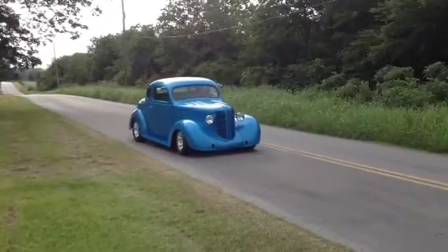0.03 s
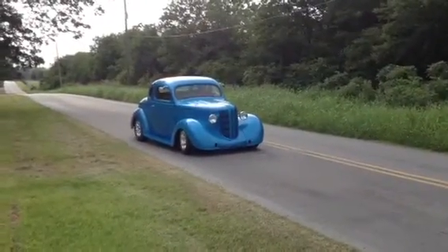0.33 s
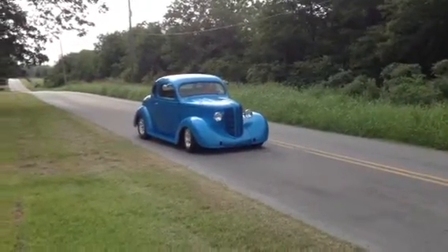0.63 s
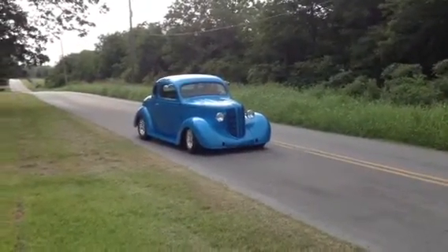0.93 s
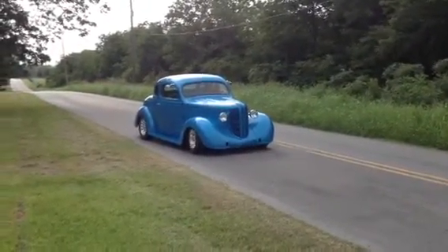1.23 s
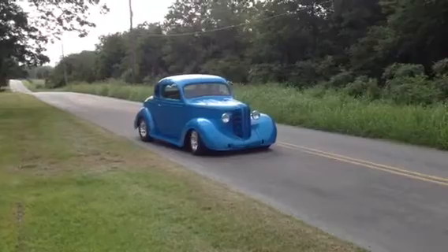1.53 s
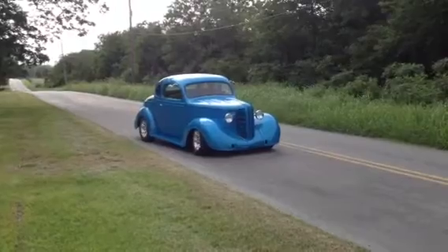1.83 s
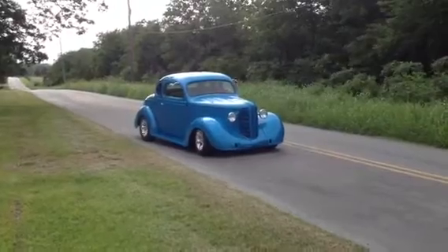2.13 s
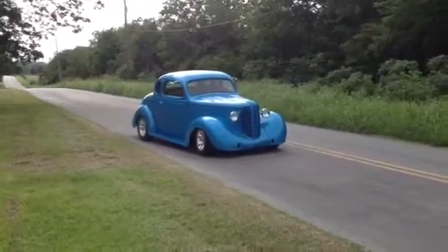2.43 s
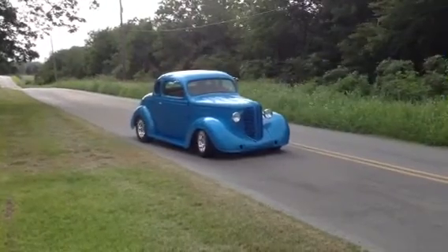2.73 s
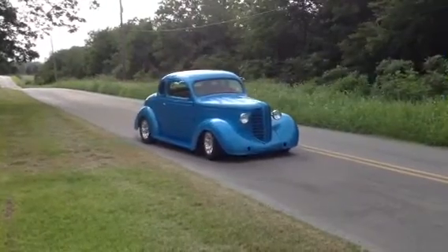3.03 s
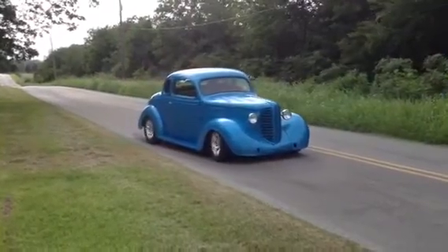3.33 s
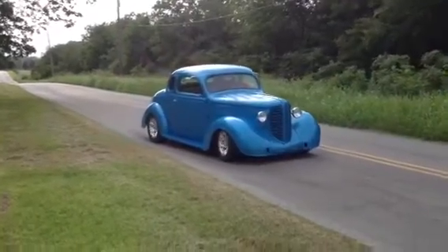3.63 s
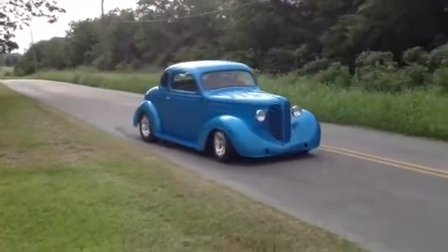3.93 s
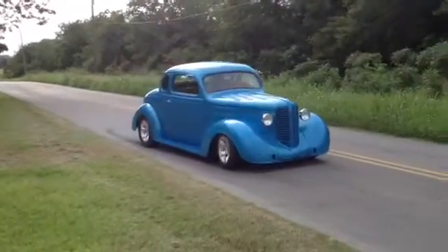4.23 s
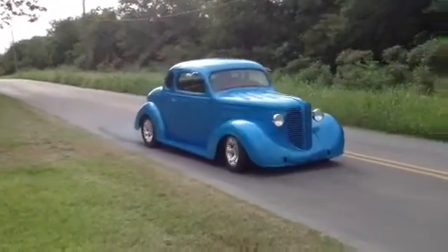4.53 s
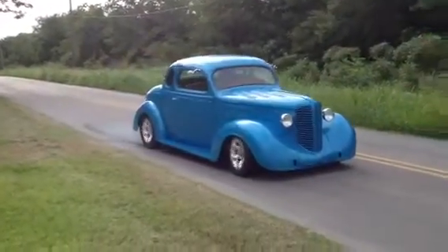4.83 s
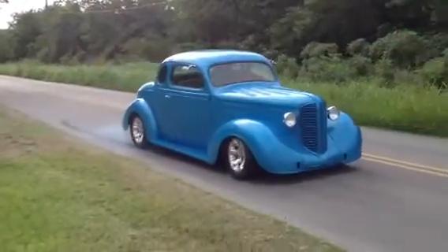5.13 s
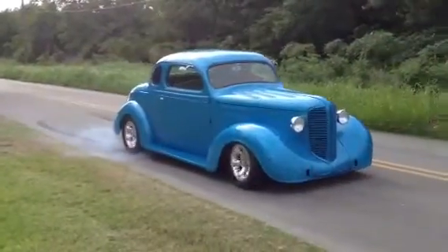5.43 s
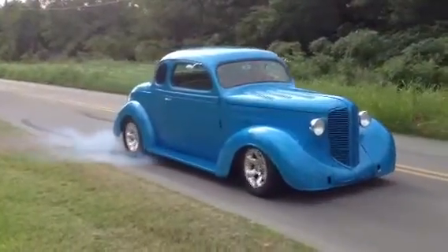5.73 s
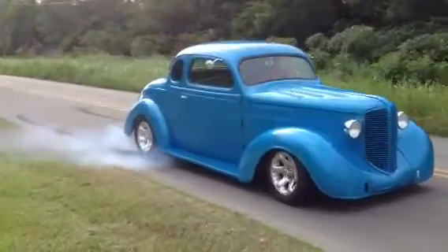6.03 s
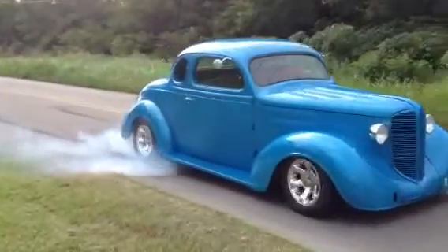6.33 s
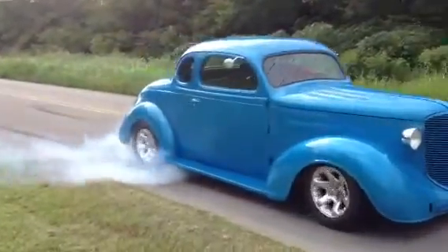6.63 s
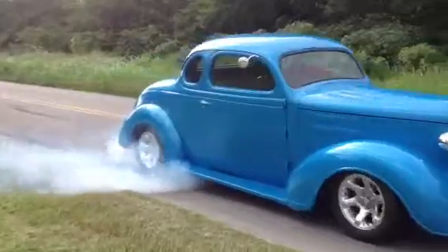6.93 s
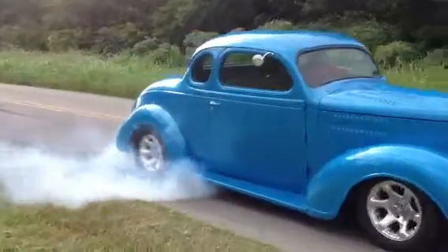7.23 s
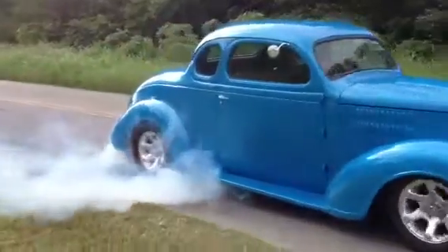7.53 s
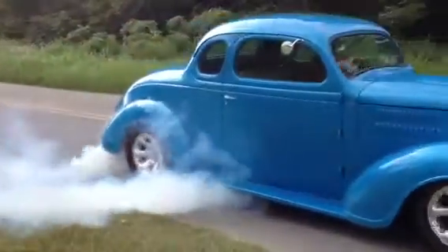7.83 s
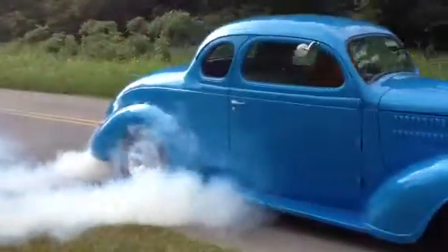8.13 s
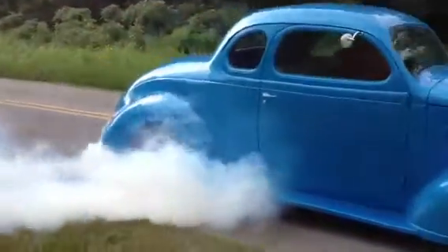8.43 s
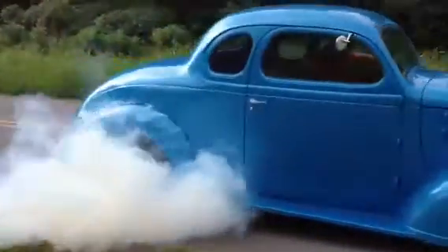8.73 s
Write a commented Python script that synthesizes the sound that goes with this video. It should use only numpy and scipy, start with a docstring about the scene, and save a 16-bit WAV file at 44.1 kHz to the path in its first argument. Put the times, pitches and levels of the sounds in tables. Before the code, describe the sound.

A hot rod engine pulses low, then revs up as the car approaches, its spinning rear tyre screeching and hissing in a burnout.

```python
"""A country road, one microphone on the verge. Some way off, a V8 hot rod creeps closer, exhaust pulsing
at low revs, its spinning rear tyre screeching and chirping in three tread resonances over the hiss of
scrubbed rubber. A thin, high whistle comes and goes. From about 5 s the revs climb, the microphone is
nudged once, and the lowest tread resonance narrows to a squeal. At 8.4 s the car draws alongside:
the hiss is brighter and the tailpipes throb in the open."""
import sys
import numpy as np
from scipy import signal
from scipy.fft import rfft, irfft, next_fast_len
from scipy.io import wavfile
from scipy.ndimage import uniform_filter1d, minimum_filter1d

SR = 44100
rng = np.random.default_rng(int(sys.argv[2]) if len(sys.argv) > 2 else 0)


def unload_wav(signal):
    """Save mono or channel-first audio to the path in sys.argv[1] as 16-bit WAV at rate SR, clipped to [-1, 1]."""
    wavfile.write(
        sys.argv[1],
        SR,
        np.round(np.clip(np.atleast_2d(signal).T, -1, 1) * 32767).astype(np.int16),
    )


N = 396459
TIME = np.arange(N) / SR
FIRING_ORDER = 8   # cylinders fired in each engine cycle
# lowest tread resonance: time_s, pitch_hz, level_db
SQUEAL_CURVE = [(0, 1090, -22), (.5, 1105, -19), (2.3, 1060, -19), (3.6, 1055, -21), (4.2, 1090, -23.5),
                (5.4, 1125, -22.5), (6.1, 1180, -19), (6.8, 1232, -13), (7.15, 1192, -8),
                (7.35, 1185, -6.5), (7.46, 1262, -9), (7.95, 1282, -12.5), (8.6, 1305, -21.5),
                (8.99, 1315, -21)]


def from_db(db):
    """Decibels to gain."""
    return 10 ** (np.asarray(db) / 20)


def unit_rms(x):
    """Scale to unit power."""
    return x / np.sqrt(np.mean(np.abs(x) ** 2) + 1e-20)


def in_time(rows):
    """Each column of a curve at every sample."""
    time_s, *columns = np.transpose(rows)
    return [np.interp(TIME, time_s, column) for column in columns]


def between(ends, share):
    """From the first value to the second as the share goes from 0 to 1."""
    return ends[0] + (ends[1] - ends[0]) * np.clip(share, 0, 1)


def phase_of(hz):
    """Running phase of a steady or moving frequency, in radians."""
    return 2 * np.pi * np.cumsum(hz * np.ones(N)) / SR


def bell_db(hz, centre_hz, width_hz, db):
    """Boost or cut of a line as it passes through a resonance."""
    return db * np.exp(-((hz - centre_hz) / width_hz) ** 2)


def drift(rate_hz):
    """Smooth random wander of spread 1."""
    hop, settle = 40, 2000
    pole = np.exp(-2 * np.pi * hop * rate_hz / SR)
    noise = rng.standard_normal(N // hop + settle + 2)
    slow = signal.lfilter([1], [1, -2 * pole, pole * pole], noise)[settle:]
    return np.interp(np.arange(N) / hop, np.arange(len(slow)), unit_rms(slow))


def coloured_noise(colour):
    """Steady noise with the given spectral shape, rms 1."""
    size = next_fast_len(N)
    hz, db = np.transpose(colour)
    bin_hz = np.maximum(np.arange(size // 2 + 1) * SR / size, 1)
    gain = from_db(np.interp(np.log(bin_hz), np.log(hz), db))
    return unit_rms(irfft(rfft(rng.standard_normal(size)) * gain, size)[:N])


def resonance(hz, width_hz, saturation, skirt):
    """A randomly driven mode: it swells and fades as fast as its width allows; saturation caps it."""
    steps = 16   # noise samples per 1 / width_hz seconds
    pushes = rng.standard_normal((2, 60000))
    core = signal.sosfilt(signal.butter(3, 1 / steps, output="sos"), pushes)
    edge = signal.sosfilt(signal.butter(3, 3 / steps, output="sos"), pushes[:, ::-1])
    swing = unit_rms(core) + skirt * unit_rms(edge)
    swing = unit_rms(swing[0] + 1j * swing[1])[200:]
    position = steps * np.cumsum(width_hz * np.ones(N)) / SR
    swing = np.interp(position, np.arange(len(swing)), swing)
    swing = swing / np.sqrt(1 + saturation * np.abs(swing) ** 2)
    return unit_rms(np.real(swing * np.exp(1j * phase_of(hz))))


def mid_rev_dip(revs):
    """The gas noise and lesser exhaust lines are quieter at middle revs: 1 there, 0 at either end."""
    return 1 - (2 * revs - 1) ** 2


def in_the_open():
    """0 while the body shields the tailpipes, 1 once they face the microphone."""
    return np.interp(TIME, [8.4, 8.45], [0, 1])


def whistle():
    """A faint, very high tone in short trembling spells."""
    # spells of the whistle: start_s, end_s, level_db
    spells = [(2.65, 2.848, -41.5), (3.041, 3.27, -50), (4.27, 4.33, -52), (4.42, 4.592, -49)]
    level = sum(from_db(db) * np.clip(np.minimum(TIME - start, end - TIME) / .015, 0, 1)
                for start, end, db in spells)
    return level * resonance(hz=14245, width_hz=60, saturation=1.5, skirt=.2)


def microphone_nudge(start_s=6.02):
    """One soft bump on the microphone: a push and its rebound."""
    age = np.maximum(TIME - start_s, 0) / .0014
    return from_db(-15) * age * (1 - age / 3) * np.exp(1 - age)


def rubber_scrub(crank):
    """Rubber tears on asphalt and rings the steel rim; the hiss brightens as the wheel comes into view."""
    # hiss of the scrubbed rubber: time_s, level_db
    hiss_curve = [(0.0, -35), (0.72, -31.5), (1.45, -33), (1.52, -30), (3.88, -30), (4.13, -32.5),
                  (4.38, -27.5), (4.46, -32.5), (5.18, -32), (5.26, -36), (5.53, -30.5), (5.91, -32.5),
                  (6.74, -29), (7.06, -33.5), (7.36, -28.5), (8.19, -27.5), (8.39, -24), (8.99, -23.5)]
    # the wheel clears the body: time_s, view (0 from afar, 1 nearer, 2 and over alongside)
    view_curve = [(0, 0), (4.4, 0.09), (5.3, 1.12), (7, 0.91), (8.3, 1.773), (8.99, 2.16)]
    # hiss spectrum at those three distances: frequency_hz, relative_db
    afar = [(2300, -24), (2750, 0), (3000, 5.5), (3450, -1), (4050, 2.5), (4350, 0.5), (4800, 0.5),
            (5400, -1.5), (6400, -4.5), (7900, -13), (9000, -9.5), (10200, -23.5), (11400, -13),
            (13300, -40)]
    nearer = [(3100, -13), (3700, -2.5), (4150, -2.5), (4850, 2), (5300, -2.5), (6300, -3), (7800, -12),
              (9200, -8.5), (10200, -21.5), (11500, -12), (13500, -30)]
    alongside = [(2300, -23.5), (2750, -1), (3150, -12), (3700, -9), (4400, -6), (4750, -3.5), (5150, -4),
                 (6700, -0.5), (8000, -8.5), (9400, -7.5), (10800, -18), (12800, -10), (15400, -36)]
    # spectrum of the lower rush under the hiss: frequency_hz, relative_db
    rush_colour = [(550, -33), (720, -8.5), (920, 5), (1200, 1.5), (1450, 0), (2000, 2), (2550, -2.5),
                   (2850, -10.5), (3150, -20.5), (4000, -36.5)]
    hiss_db, = in_time(hiss_curve)
    view = np.clip(in_time(view_curve)[0], 0, 2)
    hiss = sum(np.sqrt(np.maximum(1 - np.abs(view - k), 0)) * coloured_noise(colour)
               for k, colour in enumerate((afar, nearer, alongside)))
    flutter = from_db(0.87 * drift(24)) * (1 + 0.055 * np.cos(FIRING_ORDER * crank))
    rim_gain = from_db(-13.5 + 3.7 * drift(3.1))
    rim = rim_gain * resonance(hz=4780, width_hz=170, saturation=0.09, skirt=0.22)
    _, squeal_db = in_time(SQUEAL_CURVE)
    rush_db = -23 + 0.12 * (hiss_db - hiss_db.mean())
    rush_db -= 0.463 * np.maximum(squeal_db + 16, 0)   # the rush ducks while the squeal is loud
    return from_db(hiss_db) * (flutter * hiss + rim) + from_db(rush_db) * coloured_noise(rush_colour)


def tailpipe_gas(revs, crank):
    """Turbulence puffs from the pipes with each firing; at high revs a hollow resonance of the body wakes."""
    # spectrum of the turbulent gas: frequency_hz, relative_db
    gas_colour = [(30, -29), (70, -25), (110, 1), (170, -14.5), (330, 7.5), (470, -7.5), (570, 3.5),
                  (680, 10.5), (850, 8), (1100, 5.5), (1500, -18)]
    open_db = 3 * in_the_open()
    gas_db = between((-34, -34.5), revs) - 6 * mid_rev_dip(revs) + open_db
    hollow_db = np.interp(revs, [0.59, 1], [-54, -30]) + open_db
    puffs = 1 + 0.115 * np.cos(FIRING_ORDER * crank)
    throb = 1 + 0.58 * in_the_open() * np.cos(crank)
    hollow = from_db(hollow_db) * resonance(hz=335.5, width_hz=24, saturation=0.17, skirt=0.2)
    return from_db(gas_db) * puffs * throb * coloured_noise(gas_colour) + hollow


def exhaust_line(crank, order, db, waver_db):
    """One clean multiple of the engine cycle; combustion varies its strength a little."""
    level = from_db(db + waver_db * drift(11.0))
    return np.sqrt(2) * level * np.sin(order * crank + rng.uniform(0, 2 * np.pi))


def exhaust(cycle_hz, revs, crank):
    """The firing note leads at low revs; the lope of the uneven banks takes over as the revs climb."""
    # rasp of the pipes, two harmonics of the firing note: time_s, third_db, fourth_db
    rasp_curve = [(0, -59, -44.5), (2.7, -59, -36), (3.4, -69.5, -51), (4.7, -72, -52), (5.2, -42, -65),
                  (6.15, -39.5, -29.5), (6.9, -37.5, -42), (7.65, -34.5, -39), (7.95, -23, -31),
                  (8.45, -33.5, -45), (8.99, -24.5, -34)]
    # other exhaust lines: order (rounded, a multiple of the cycle rate), low_revs_db, high_revs_db
    other_lines = [(3, -88.5, -42), (4, -72.5, -50), (6, -61, -25.5), (7, -40.5, -37), (9.1, -36, -39),
                   (10, -38.5, -36), (11.1, -32, -30.5), (12, -39, -34.5), (12.524, -31, -37),
                   (13.74, -44, -44), (14.9, -58, -53), (16, -37, -38.5), (17.2, -53, -41.5),
                   (17.8, -36.5, -66), (19, -45.5, -46), (20, -58.5, -46), (21, -48.5, -45), (22, -70, -47),
                   (23, -63, -61), (26, -54.5, -45), (27, -66, -45), (29, -58, -50), (34, -43.5, -52),
                   (40, -45, -36)]
    pipe_boom_db = bell_db(FIRING_ORDER * cycle_hz, centre_hz=205.6, width_hz=36, db=9.7)
    firing_db = between((-23, -34.5), revs) + pipe_boom_db
    lope_db = between((-51.5, -19.5), revs)
    out = exhaust_line(crank, FIRING_ORDER, firing_db, waver_db=0.74)
    out += exhaust_line(crank, order=5, db=lope_db, waver_db=1.0)
    for harmonic, rasp_db in enumerate(in_time(rasp_curve), 3):
        out += exhaust_line(crank, harmonic * FIRING_ORDER, rasp_db, waver_db=1.76)
    for order, *ends_db in other_lines:
        silencer_db = bell_db(order * cycle_hz, centre_hz=395, width_hz=101, db=-8)
        line_db = between(ends_db, revs) - 1.5 * mid_rev_dip(revs) + silencer_db
        out += exhaust_line(crank, round(order), line_db, waver_db=between((1.0, 2.5), revs))
    return out * from_db(2 * in_the_open())


def tread_chirps(edge_s=0.012, wobble_hz=14, flicker_db=0.2):
    """Now and then the tread catches: one resonance rings out clean, wobbles and lets go."""
    # catches of the tread: start_s, length_s, pitch_hz, level_db
    catches = [(0.02, .05, 2020, -16.5), (1.166, .1, 1810, -27), (3.63, 0.047, 1830, -19),
               (3.944, 0.055, 1812, -19), (4.225, 0.079, 1805, -20), (4.297, 0.098, 1157, -17.5),
               (4.389, 0.041, 1775, -8), (5.53, 0.052, 1099, -19), (6.23, 0.056, 1185, -18),
               (6.357, 0.092, 1180, -17), (6.55, 0.098, 1790, -17), (7.099, 0.027, 1195, -11),
               (7.447, 0.0432, 1825, -16), (7.787, 0.029, 1784, -20), (8.066, 0.1, 1274, -10),
               (8.212, 0.044, 1272, -9.5), (8.315, 0.03, 1300, -11), (8.874, 0.052, 1320, -18)]
    wobble = phase_of(wobble_hz * drift(30.77))
    out = np.zeros(N)
    for start, length, hz, db in catches:
        held = np.clip(np.minimum(TIME - start, start + length - TIME) / edge_s, 0, 1)
        out += np.sqrt(2) * from_db(db) * held * np.sin(2 * np.pi * hz * TIME + wobble)
    return out * from_db(flicker_db * drift(45))


def tyre_tread(revs):
    """Tread blocks stick and slip, driving three resonances: low squeal, pulsing screech, high shriek."""
    # second tread resonance: time_s, pitch_hz, level_db
    screech_curve = [(0, 2022, -23), (1.6, 1922, -25.5), (3.8, 1839, -20), (4.5, 1766, -16),
                     (5.15, 1766, -16), (5.3, 1760, -21), (6.35, 1842, -20.5), (6.65, 1843, -16),
                     (7.25, 1751, -24), (7.9, 1810, -19.5), (8.15, 1907, -27), (8.99, 1928, -26.5)]
    # the squeal loses its grip for a moment: centre_s, half_length_s
    breaks = [(7.088, 0.0122), (7.135, 0.0079), (7.196, .005), (7.275, 0.006), (7.302, 0.0049),
              (7.372, 0.0094), (7.413, 0.0127), (7.591, 0.0054), (7.674, 0.016), (7.765, 0.018),
              (8.196, 0.012), (8.308, .008), (8.37, 0.012)]
    squeal_hz, squeal_db = in_time(SQUEAL_CURVE)
    screech_hz, screech_db = in_time(screech_curve)

    # the tyre hops and grabs, faster and deeper as it gains speed; deep grabs go with a loud screech
    grabs_per_s = between((14, 62), revs ** .7)
    grab = phase_of(grabs_per_s * (1 + .17 * drift(14)))
    depth = np.interp(screech_db, (-30.5, -19.5), (.2, 0.68)) * between((.45, 1), revs / 0.76)
    shake = depth * np.sin(grab)
    bursts = unit_rms(1 + depth * np.cos(grab))

    # as the wheel speeds up, the squeal locks into one narrow note held at its friction limit
    width_hz = np.interp(revs, (.35, .68), (120, 34))
    lock = 0.043 + (55 / width_hz) ** 2
    grip = np.prod([1 - 0.845 * np.exp(-((TIME - at) / half) ** 2) for at, half in breaks], axis=0)
    wandering_hz = squeal_hz + .14 * width_hz * drift(19.71)
    squeal = grip * (1 + 0.38 * shake) * resonance(wandering_hz, width_hz, saturation=lock, skirt=0.46)

    bent_hz = screech_hz + 22 * shake + 30 * drift(25.36)
    screech = bursts * resonance(bent_hz, width_hz=105, saturation=0.13, skirt=0.93)

    # the shriek, about an octave over the squeal, yields to the screech and fades as the car draws level
    shriek_hz = between((1.98, 2.04), revs) * squeal_hz + 40 * drift(30.2)
    shriek_db = between((-21.5, -34.5), revs ** 1.5)
    shriek_db -= 0.204 * (screech_db - screech_db.mean()) + 8 * in_the_open()
    shriek = resonance(shriek_hz, 70 + 1.15 * width_hz, saturation=0.017, skirt=0.25)
    return from_db(squeal_db) * squeal + from_db(screech_db) * screech + from_db(shriek_db) * shriek


def scene():
    """Engine and tyre, heard in mono from the verge."""
    # engine speed in full firing cycles: time_s, cycle_hz
    engine_speed = [(0.0, 19.3), (0.95, 19.6), (1.38, 19.7), (1.85, 19.7), (2.95, 20.0), (3.18, 20.2),
                    (4.23, 20.6), (4.48, 20.6), (5.11, 21.7), (5.61, 23.0), (5.96, 24.5), (6.48, 27.6),
                    (7.26, 31.4), (7.44, 32.5), (7.76, 34.2), (8.14, 35.1), (8.39, 35.6), (8.99, 36.0)]
    rev_range_hz = (19.3, 36)
    cycle_hz, = in_time(engine_speed)
    revs = np.interp(np.log(cycle_hz), np.log(rev_range_hz), [0, 1])   # 0 low, 1 high
    crank = phase_of(cycle_hz * (1 + .0012 * drift(8.04)))
    engine = exhaust(cycle_hz, revs, crank) + tailpipe_gas(revs, crank)
    tyre = tyre_tread(revs) + tread_chirps() + rubber_scrub(crank)
    return (engine + tyre + whistle() + microphone_nudge())[None]


def record(dry):
    """A fast limiter holds the peaks down, and a steep filter cuts the top treble."""
    ceiling, cutoff_hz = .71, 15400
    allowed_gain = np.minimum(1, ceiling / (np.abs(dry) + 1e-9))
    gain = uniform_filter1d(minimum_filter1d(allowed_gain, size=241), size=241)
    lowpass = signal.ellip(10, .1, 80, cutoff_hz, fs=SR, output="sos")
    return signal.sosfilt(lowpass, gain * dry)


dry = scene()
out = record(dry)
unload_wav(out)
```